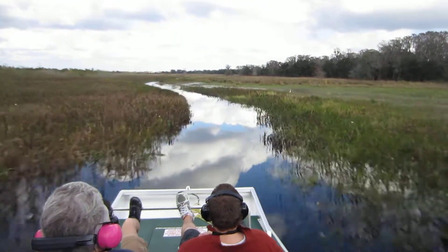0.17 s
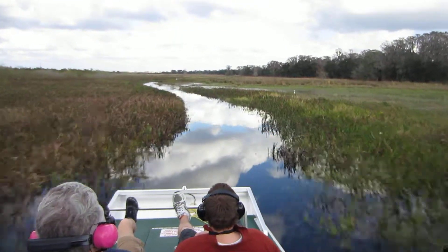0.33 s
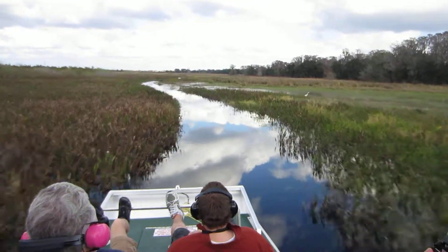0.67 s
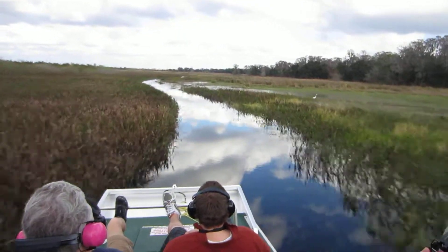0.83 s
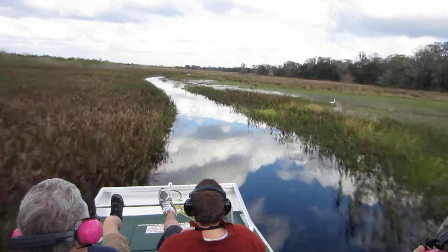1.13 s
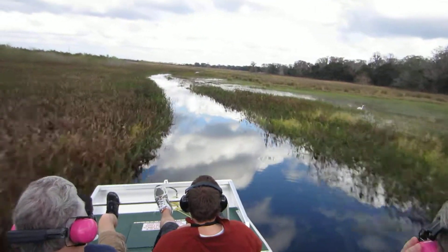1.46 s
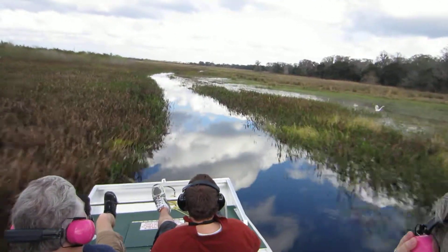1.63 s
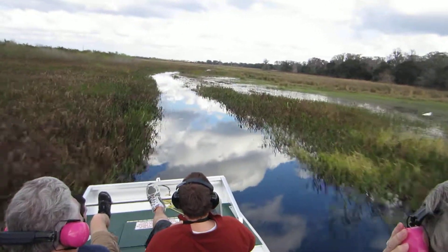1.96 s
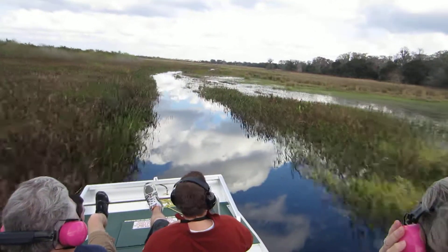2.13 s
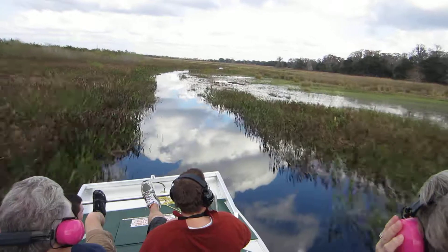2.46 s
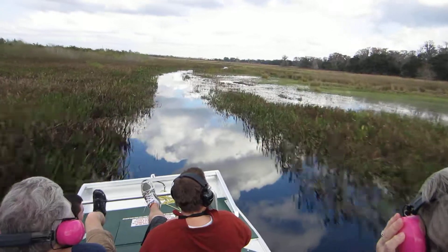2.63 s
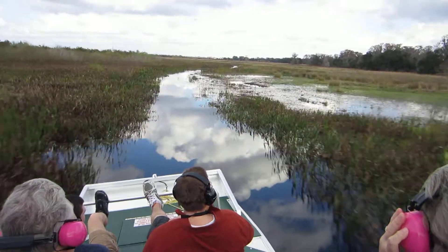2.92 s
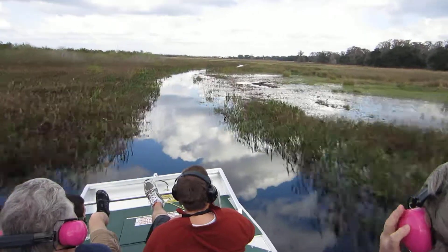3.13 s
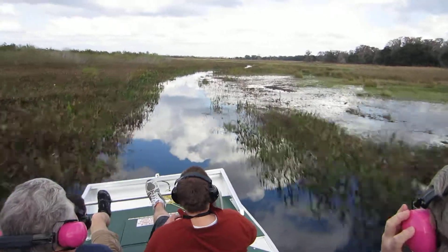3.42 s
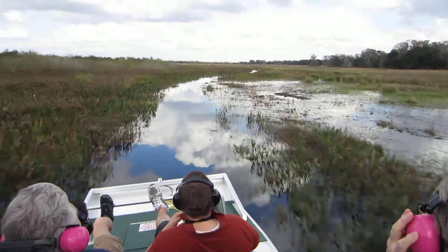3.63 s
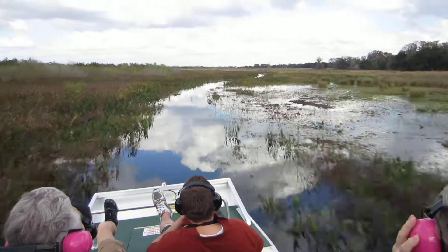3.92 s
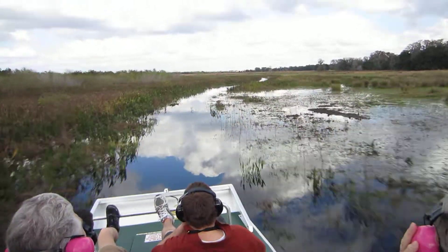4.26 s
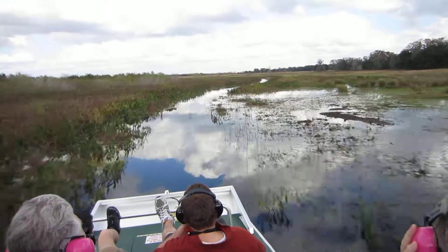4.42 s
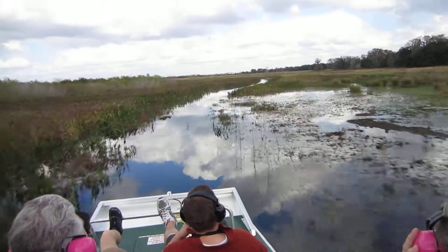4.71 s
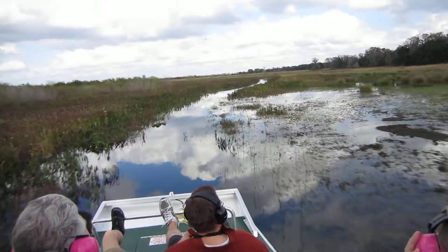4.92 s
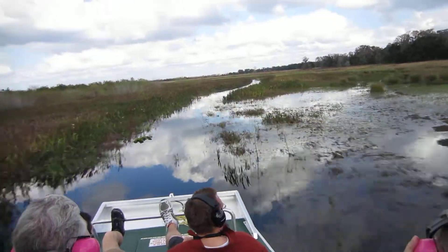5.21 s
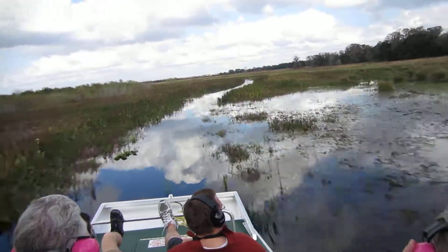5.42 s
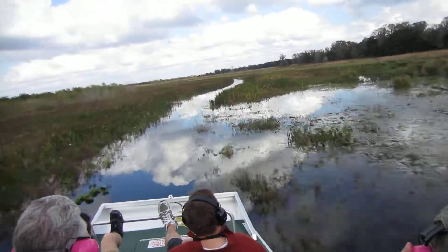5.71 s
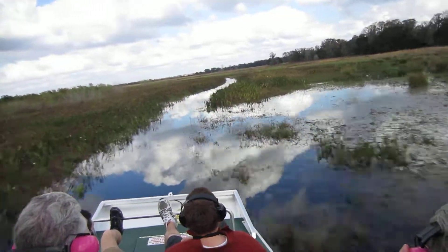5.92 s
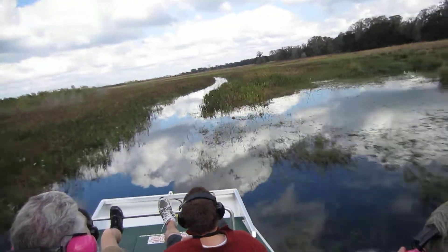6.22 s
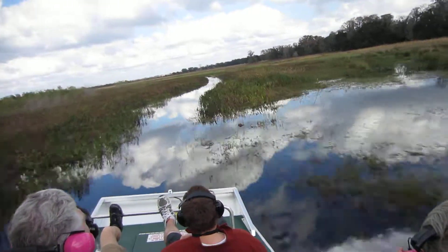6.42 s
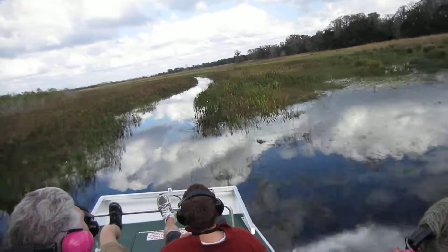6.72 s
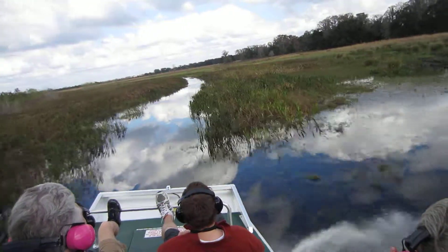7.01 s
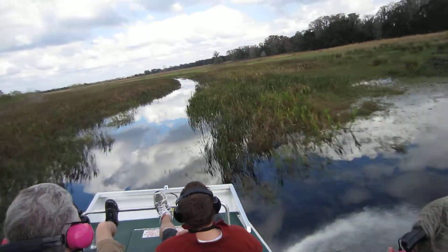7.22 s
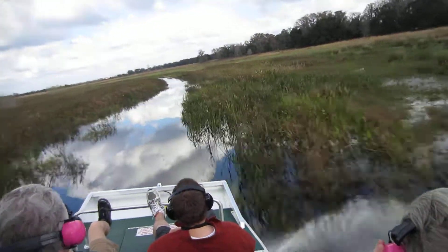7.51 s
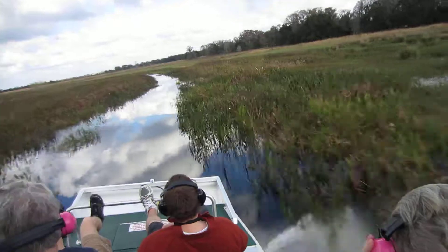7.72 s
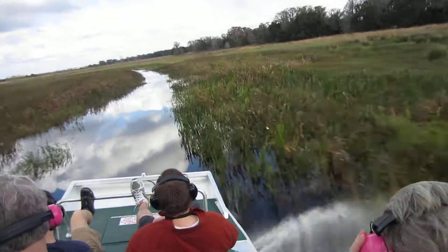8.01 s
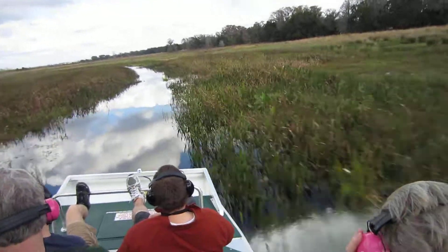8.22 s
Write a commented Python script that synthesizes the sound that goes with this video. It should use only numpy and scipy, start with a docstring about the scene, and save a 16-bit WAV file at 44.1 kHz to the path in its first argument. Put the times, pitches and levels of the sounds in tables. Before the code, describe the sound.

A fast airboat runs continuously along an outdoor channel. At first wide, crackling wind turbulence dominates, heavier on the right, with the piston engine and large propeller humming beneath. As the boat turns, the wind dulls and weakens, while the beating drone, chopped slipstream roar and watery hiss surge forward. The onboard microphone is close, slightly overloaded, with no echo.

```python
"""An airboat's piston engine, a harmonic series on the crank rate, drives a geared five-blade propeller
along a marsh channel; the two notes beat together. Around them are noises shaped by their spectra:
slipstream roar chopped at the blade rate, turbulence at two microphone ports, and hissing spray.
The wind eases as the boat swings into a bend, where the drone swells in steps. Heard from a passenger seat.
"""
import sys
import numpy as np
from scipy import signal
from scipy.fft import rfft, irfft, next_fast_len
from scipy.io import wavfile
from scipy.ndimage import uniform_filter1d, minimum_filter1d

SR = 44100
rng = np.random.default_rng(int(sys.argv[2]) if len(sys.argv) > 2 else 0)


def to_wav(s):
    """Save 16-bit WAV."""
    ch = np.atleast_2d(s).T  # columns
    pcm = np.round(np.clip(ch, -1, 1) * 32767)  # PCM
    wavfile.write(sys.argv[1], SR, pcm.astype(np.int16))


N = 369116
TIME = np.arange(N) / SR


def undb(db):
    """Decibel law: 20 dB is a tenfold amplitude."""
    return 10 ** (np.asarray(db) / 20)


def curves(table):
    """Linear interpolation: each column of a timed table, sample by sample."""
    seconds, *columns = np.transpose(table)
    return [np.interp(TIME, seconds, column) for column in columns]


def colour(x, points):
    """Linear filtering: multiply the spectrum by gains drawn through (frequency [Hz], level [dB]) points."""
    size = next_fast_len(N, real=True)
    hz, db = np.transpose(points)
    bins = np.maximum(np.fft.rfftfreq(size, 1 / SR), 1)
    gain = undb(np.interp(np.log(bins), np.log(hz), db))
    return irfft(rfft(x, size) * gain, size)[..., :N]


def noise(points, channels):
    """Spectral density: independent Gaussian noises with the given level in dB per Hz."""
    white = rng.standard_normal((channels, N)) * np.sqrt(SR / 2)  # 0 dB per Hz
    return colour(white, points)


def below(x, hz):
    """Zero-phase low-pass: filtering forwards and backwards cancels the delay."""
    return signal.sosfiltfilt(signal.butter(2, hz, fs=SR, output="sos"), x)


def walk(rate):
    """Random modulation: lines join chance values drawn rate times a second; the spread is near 1."""
    knots = rng.standard_normal(16384)
    return 1.22 * np.interp(TIME * rate, np.arange(len(knots)), knots)


def pan(db):
    """Interchannel level difference: left and right gains for left minus right in dB."""
    return undb(np.array([[1], [-1]]) * db / 2)


# Engine speed, falling from its peak as the boat turns: (time [s], crank rate [turns per second])
SPEED = [(0, 67.3), (1.0, 67.14), (1.75, 68.18), (3.5, 68.56), (5.0, 67.6), (5.5, 67.03), (7.0, 66.13),
         (8.0, 66.83), (8.37, 66.25)]


def crank_turns():
    """Phase is the integral of frequency: crankshaft turns completed so far."""
    crank_hz, = curves(SPEED)
    return np.cumsum(crank_hz) / SR


STRAIGHT_DB = -13.5  # drone level before the turn
# Steps of the drone as the boat turns: (start [s], length [s], change [dB])
SWELLS = [(3.3, .8, 7), (5.445, 1.27, 6.5), (8.05, .3, -1.5)]


def drone_level():
    """Level envelope in dB: steady on the straight, then an even ramp at each step."""
    level_db = STRAIGHT_DB
    for start, length, change_db in SWELLS:
        level_db = level_db + change_db * np.clip((TIME - start) / length, 0, 1)
    return level_db


# Exhaust harmonics before trim, at the two ends of the bend scale:
# (multiple of the crank rate [-], level at bend 0 [dB], level at bend 1 [dB])
EXHAUST = [(1, -40.5, -34.5), (2, -37, -27), (3, -32, -26.5), (4, -38.5, -25.5), (5, -41, -28.3),
           (6, -46, -28), (7, -39.5, -35.5), (8, -48.5, -33), (9, -45.5, -34.5), (10, -39, -35.5),
           (11, -48, -53), (12, -48.5, -65), (14, -52, -44.5)]


def engine(turns, bend, trim_db=0.94, smear=.375, order=5, rough=0.021, waver_db=0.66, left_db=-0.5):
    """Harmonic series: pulses repeat every crank turn; pipes smear low harmonics, higher ones rasp together."""
    note = 0
    for multiple, cruise_db, bend_db in EXHAUST:
        level_db = cruise_db + bend * (bend_db - cruise_db) + waver_db * walk(6)
        lag = smear * min(multiple, order) ** 2 / 2  # cycles; the same for every harmonic from order up
        note = note + undb(level_db) * np.sin(2 * np.pi * (multiple * (turns + .5) - lag))
    roughness = 1 + rough * walk(130)
    return np.sqrt(2) * undb(trim_db) * note * roughness * pan(left_db)


GEARING, BLADE_COUNT = .3819, 5  # propeller turns per crank turn; blades
# Propeller harmonics before trim, strongest at the blade rate: (multiple of the shaft rate [-], level [dB])
BLADES = [(2, -52.8), (3, -39.5), (4, -45), (5, -29), (7, -40), (8, -37), (9, -48.5), (11, -41.5),
          (12, -56)]


def propeller(turns, drone_db, trim_db=0.7, follow=0.84, waver_db=1.0, left_db=2.5):
    """Beating: the blade rate is just under twice the crank rate, so they throb about six times a second."""
    shaft = GEARING * turns + rng.random()
    note = 0
    for multiple, level_db in BLADES:
        note = note + undb(level_db + waver_db * walk(4)) * np.sin(2 * np.pi * multiple * shaft)
    return np.sqrt(2) * note * undb(follow * drone_db + trim_db) * pan(left_db)


def whine(turns, drone_db, db=-49, follow=1.0, waver_db=3):
    """Fixed drive ratio: a belt-driven alternator sings thinly at a multiple of the crank rate."""
    ratio = 36.66  # whine cycles per crank turn
    tone = np.sin(2 * np.pi * ratio * turns + .5 * walk(9.7))
    return np.sqrt(2) * tone * undb(db + follow * drone_db + waver_db * walk(7.0))


# Slipstream and exhaust roar at drone level 0 dB: (frequency [Hz], density [dB per Hz])
ROAR = [(20, -85), (60, -70), (130, -59.5), (260, -49), (400, -52.5), (700, -55), (1000, -59.5),
        (1600, -65.5), (2400, -73), (2950, -74.5), (3600, -84.5), (6000, -87), (15000, -115)]


def slipstream(turns, drone_db, follow=0.71, chop=0.16, flutter_db=1.4, apart_db=-14):
    """Amplitude modulation: air torn by the propeller swells with each blade."""
    shared, apart = noise(ROAR, channels=2)
    blades = 1 + chop * np.cos(2 * np.pi * BLADE_COUNT * GEARING * turns)
    roar = shared + undb(apart_db) * apart * np.array([[1], [-1]])  # opposite signs widen it
    return roar * blades * undb(follow * drone_db + flutter_db * walk(25))


GUST_RATE, GUST_DB = 14, 0.5  # small random gusts: changes per second; spread in dB
# Gusts and lulls in the wind's treble: (middle [s], length [s], change [dB])
GUSTS = [(2.268, .2, -3), (4.604, 0.17, -7), (4.95, 0.44, 1.4)]


def gusts():
    """Raised-cosine envelope: each gust or lull is a smooth hump in dB, among smaller random ones."""
    humps = 0
    for middle, length, change_db in GUSTS:
        humps = humps + change_db * np.cos(np.pi * np.clip((TIME - middle) / length, -.5, .5)) ** 2
    return humps + GUST_DB * walk(GUST_RATE)


# Wind course: (time [s], strength [dB], treble level [dB], left minus right before scaling [dB])
WIND = [(0, -1, .2, -4.5), (.6, -1.3, 1.6, -3.5), (1.6, -0.1, -.7, -3), (2.8, .5, 1, -4),
        (3.8, -1.5, -5.5, -7), (5.1, -2.1, -6.5, -7.5), (5.5, -4, -7.5, -3), (6.6, -5.5, -7, 0.5),
        (8.0, -5.5, -4.5, 1), (8.37, -3.5, -7, -2)]
# Turbulence at one port before the wind course: (frequency [Hz], density [dB per Hz])
BUFFET = [(40, -66), (65, -60), (130, -52), (300, -48.5), (550, -51.5), (1000, -55), (1600, -58.5),
          (2300, -63.5), (2950, -69), (3700, -75), (5000, -79), (8000, -86.5), (10500, -98.5),
          (15000, -101)]


def wind(gust_db=0.75, eddy_db=1.18, crackle_db=1.97, hiss_tilt=1.2, hiss_flicker=1.36,
         low_flicker=0.29, low_left_db=2.5, low_side=0.52, high_side=1.23, hiss_side=1.0):
    """Incoherent turbulence: each port has its own, and eddies shake the treble more than the bass."""
    strength_db, treble_db, side_db = curves(WIND)
    bright_db = treble_db - strength_db + gusts()
    air = noise(BUFFET, channels=2)
    low, under_hiss = below(air, 880), below(air, 3600)
    eddies = np.array([eddy_db * walk(110) + crackle_db * walk(700) for _ in range(2)])
    flicker = gust_db * walk(36) + eddies  # gusts reach both ports, eddies only one
    rumble = low * undb(low_flicker * flicker) * pan(low_left_db + low_side * side_db)
    flutter = (under_hiss - low) * undb(bright_db + flicker) * pan(high_side * side_db)
    hiss = (air - under_hiss) * undb(hiss_tilt * bright_db + hiss_flicker * flicker)
    return undb(strength_db) * (rumble + flutter + hiss * pan(hiss_side * side_db))


# Spray off the hull at drone level 0 dB: (frequency [Hz], density [dB per Hz])
SPRAY = [(1000, -79), (3000, -99), (5500, -83.5), (8000, -85), (10500, -93), (15000, -105)]


def spray(drone_db, follow=0.76, splash_db=0.6, grain_db=2.0, left_db=1.5):
    """Granular noise: fine water thrown from the hull, rising with the drone as the boat slides."""
    level_db = follow * drone_db + splash_db * walk(20) + grain_db * walk(900)
    return noise(SPRAY, channels=2) * undb(level_db) * pan(left_db)


def buzz(rush, turns, bend, depth=0.42, above_hz=550):
    """Periodic modulation: with a loud drone, the upper rushing noise dips briefly once a crank turn."""
    pulse = np.exp(10 * (np.cos(2 * np.pi * turns) - 1))
    dip = depth * np.clip(bend, 0, 1) * pulse
    return rush - dip * (rush - below(rush, above_hz))


CRUISE_DB = -12  # drone level at bend 0


def scene():
    """Superposition: engine and propeller behind the seat, water below, wind in front."""
    turns = crank_turns()
    drone_db = drone_level()
    bend = 1 - drone_db / CRUISE_DB  # just under 0 on the straight, 1 at drone level 0 dB
    drive = engine(turns, bend) + propeller(turns, drone_db) + whine(turns, drone_db)
    rush = slipstream(turns, drone_db) + wind() + spray(drone_db)
    return drive + buzz(rush, turns, bend)


def limit(x, ceiling):
    """Gain reduction: both channels turn down for a few milliseconds around any peak over the ceiling."""
    need = np.minimum(1, ceiling / (np.abs(x).max(axis=0) + 1e-9))
    return x * uniform_filter1d(minimum_filter1d(need, size=201), size=201)


NOTCH_HZ, TOP_HZ = 12000, 15850  # port notch; upper band limit
# Widening of the closely spaced microphones: (frequency [Hz], gain of left minus right [dB])
WIDENING = [(60, 9), (300, 8), (1000, 9.5), (2300, 6.5), (3300, 4.5), (5000, 2), (8000, -0.5)]


def record(dry, overload=1.77, low_cut_hz=32):
    """Saturation, then band limits: capsules squash peaks, widening lifts the wind, ports notch the treble."""
    squashed = np.tanh(overload * dry) / overload
    low_cut = signal.butter(2, low_cut_hz, "high", fs=SR, output="sos")
    left, right = signal.sosfilt(low_cut, squashed)
    mid, side = (left + right) / 2, colour((left - right) / 2, WIDENING)
    notch = signal.iirnotch(NOTCH_HZ, 4.5, fs=SR)
    wide = signal.lfilter(*notch, np.array([mid + side, mid - side]))
    top_cut = signal.ellip(10, .2, 80, TOP_HZ, fs=SR, output="sos")
    return signal.sosfilt(top_cut, limit(wide, .67))


dry = scene()
out = record(dry)
to_wav(out)
```